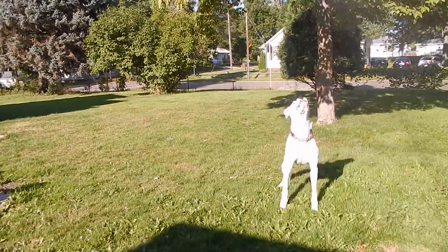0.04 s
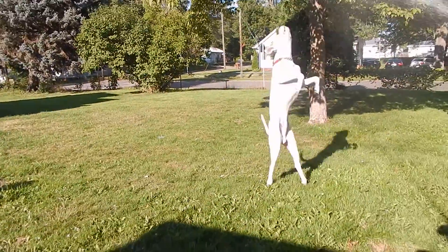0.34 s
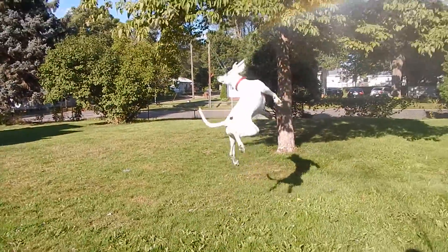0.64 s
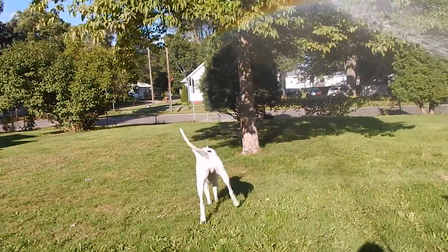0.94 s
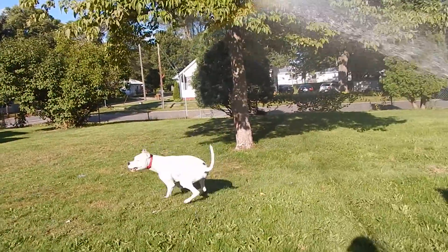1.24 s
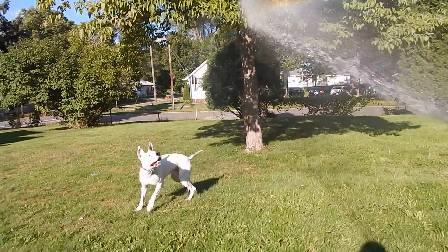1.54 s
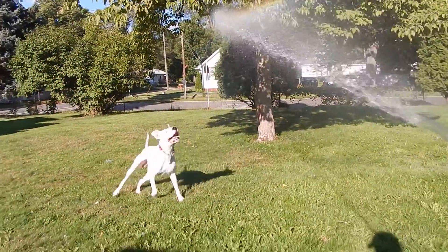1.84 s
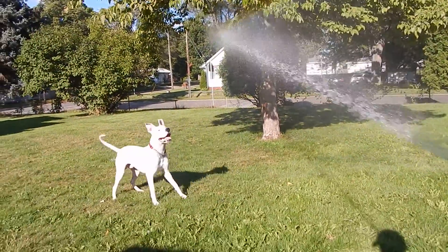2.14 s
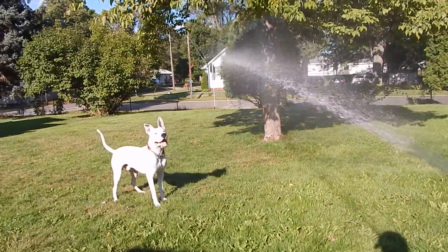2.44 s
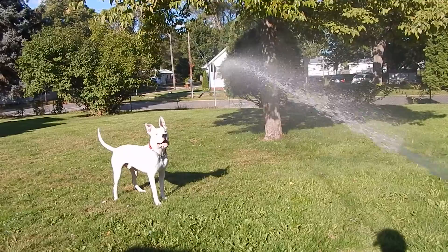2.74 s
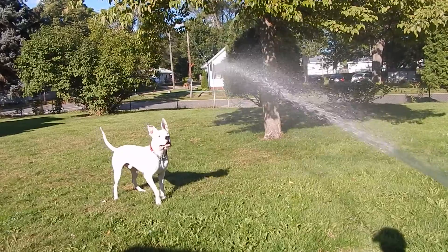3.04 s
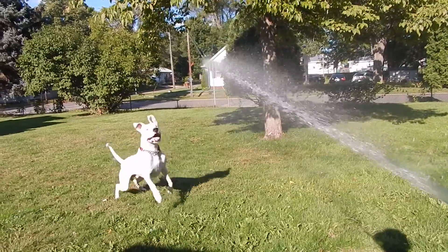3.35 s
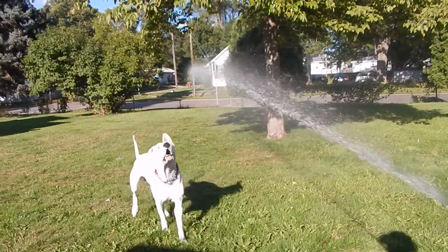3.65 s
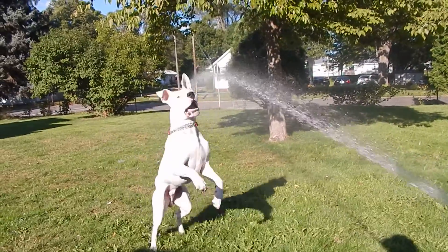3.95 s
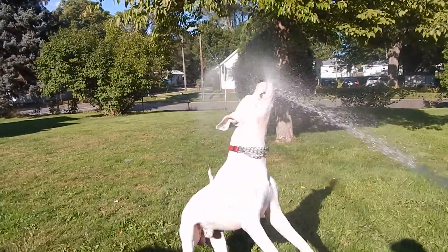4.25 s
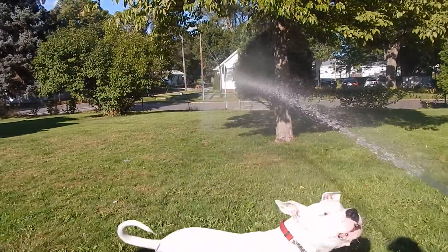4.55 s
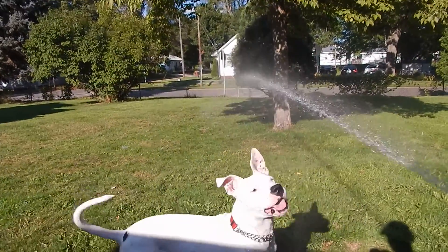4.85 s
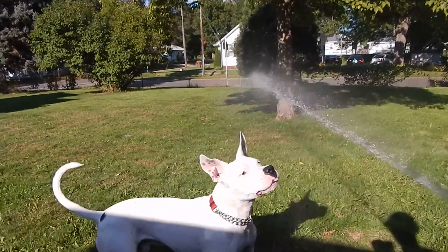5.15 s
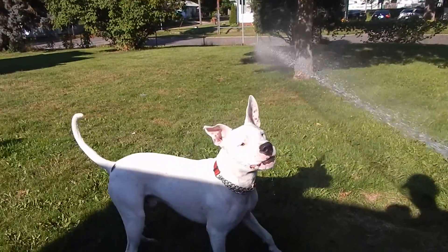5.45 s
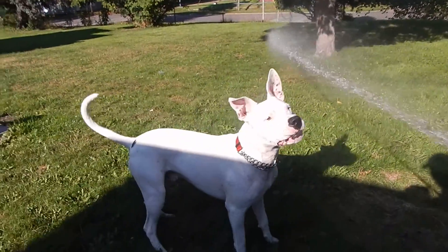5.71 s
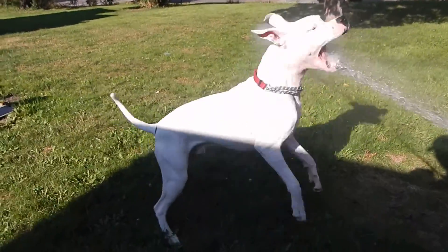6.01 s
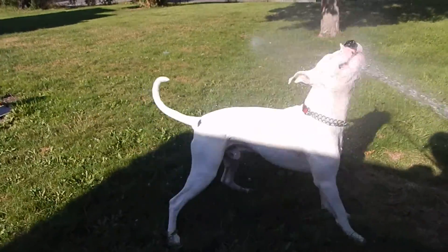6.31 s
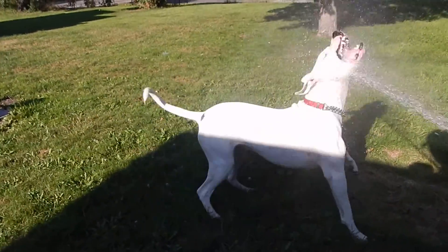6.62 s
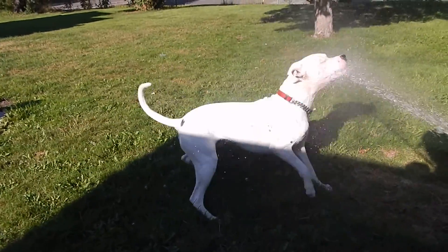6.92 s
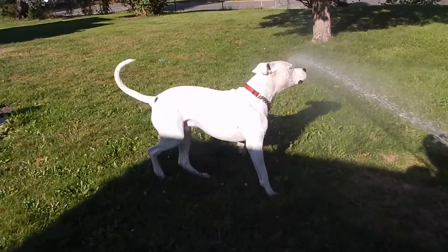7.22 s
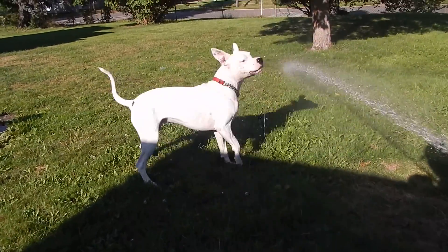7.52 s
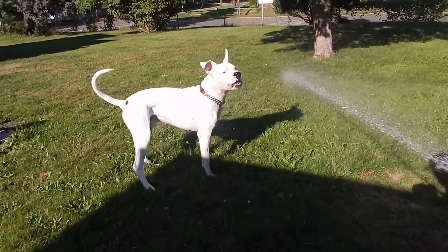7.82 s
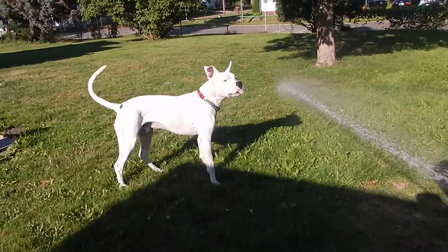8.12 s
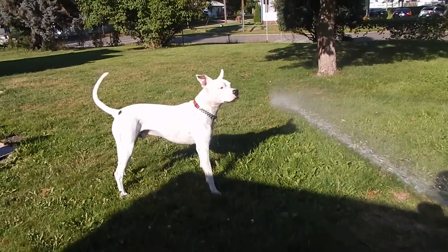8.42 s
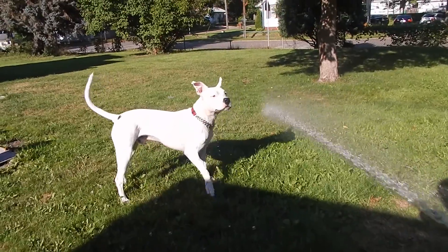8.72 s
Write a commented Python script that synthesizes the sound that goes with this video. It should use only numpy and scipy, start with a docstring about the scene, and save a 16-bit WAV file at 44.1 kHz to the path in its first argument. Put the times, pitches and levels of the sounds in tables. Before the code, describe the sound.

A garden hose hisses steadily close by, a little to the right, over a low rush. At first the spray patters through tree leaves. Later it splashes on a dog's muzzle, once briefly and then for longer, with gurgles and wet jaw smacks. Stray drops hit the microphone with sharp, loud clicks, and after the loudest the whole sound ducks and swells back. An engine drones faintly far off.

```python
"""A garden hose hisses close by while a dog jumps and bites at the jet of water.
The spray patters through leaves, drums on the dog's muzzle and sloshes in its mouth. An engine drones
far off. Stray drops hit the microphone's case with sharp clicks: the loud ones knock its automatic
volume control down, and the whole garden then swells back."""
import sys
import numpy as np
from scipy import signal
from scipy.fft import rfft, irfft, next_fast_len
from scipy.io import wavfile
from scipy.ndimage import uniform_filter1d, minimum_filter1d

SR = 44100
rng = np.random.default_rng(int(sys.argv[2]) if len(sys.argv) > 2 else 0)


def bounce(signal):
    """Save signal as a 16-bit WAV file at the path given by the first command-line argument."""
    frames = np.transpose(np.atleast_2d(signal))
    limited = np.clip(frames, -1, 1)
    pcm = np.round(limited * 32767).astype(np.int16)
    wavfile.write(sys.argv[1], SR, pcm)


N = 391166

# The jet's hiss as the nozzle is moved about: time_s, level_db
HISS_LEVELS = [(0, -36), (1.5, -34.5), (2.3, -40), (3.5, -41.5), (4.6, -42.5), (5.7, -39.5), (7.4, -43),
               (8.1, -42), (8.87, -38)]
# Tone of the bright hiss: frequency_hz, gain_db
HISS_TONE = [(400, -33), (800, -3), (1100, 1.5), (1450, -3.5), (2200, -3), (3200, -5), (4500, -7.5),
             (6500, -8.5), (8500, -9.5), (11000, -7.5), (13000, -14), (16000, -32)]
# Tone of the low rush under it: frequency_hz, gain_db
RUSH_TONE = [(20, -49), (45, -16), (80, -2), (130, -3.5), (200, 0), (340, -0.5), (480, -7), (800, -6),
             (1400, -19.5), (3000, -28.5)]

# One curve for each time the dog meets the jet: time_s, level_db, treble_lift_db
MUZZLE_HITS = [
    [(4.183, -28, 9), (4.212, -27, 9.5), (4.236, -18.5, 4), (4.28, -24, 5.5)],
    [(6.032, -26.5, 4.5), (6.08, -15, 1), (6.14, -19, 1.5), (6.19, -16.5, -5.5), (6.3, -26, 1.5),
     (6.43, -24, 3), (6.62, -16.5, -4), (6.73, -23.5, 3.5), (6.87, -28, -2), (7.0, -26.5, 0)],
]
# Tone of water hitting the dog: frequency_hz, gain_db
SPLASH_TONE = [(100, -18), (400, -13.5), (800, -9.5), (1200, -10), (2200, -3.5), (3500, -1), (5000, 0.5),
               (9000, 1), (11500, 0.5), (16000, -12)]
# The dog's mouth fills and its pitch sinks: start_s, length_s, first_hz, last_hz, level_db
MOUTH_FILLS = [(4.165, .11, 1037, 520, -32.5), (6.142, .24, 955, 620, -28)]
# Single smacks of the wet jaws: start_s, pitch_hz, level_db
JAW_SMACKS = [(6.837, 805, -32), (6.889, 790, -32), (7.102, 890, -38.5), (7.593, 1550, -31.5),
              (7.876, 2980, -39.5), (7.935, 930, -36.5)]

# Spray in the treetop until the jet is lowered: time_s, level_db
TREETOP_LEVELS = [(0, -36.5), (.4, -37), (.7, -35.5), (1.2, -31.5), (1.6, -38.5), (2.2, -48.5), (2.6, -83)]
# The jet brushes single branches: time_s, peak_db
BRANCH_HITS = [(.48, -30), (.57, -31), (.78, -27.5), (0.884, -30), (1.02, -29.5), (1.19, -33),
               (1.729, -32.5)]
# Tone of water hitting leaves: frequency_hz, gain_db
LEAF_TONE = [(200, -8.5), (600, -15), (1400, -6), (2800, 0), (4500, -3.5), (7500, -6.5), (11000, -6.5),
             (16000, -26)]

# Single drops on the case, from big knocks to faint ticks (splat and thud are relative to the tick): time_s,
# peak_db, splat_db, thud_db
SINGLE_DROPS = [(.0664, 14.5, -7, -24), (.0672, 17, -9, 3.5), (.1182, 8.5, -12, -24), (.294, 0.5, -24, -42),
                (1.252, 14.5, -1, -14), (2.2022, -4.5, -14, -31), (2.2608, -11, -10, -40),
                (2.5159, 12.5, -9, -25), (2.562, 9, -17, -37), (2.8398, 6.5, -15, -26),
                (2.9406, 9.5, -9.5, -35), (3.0814, 10, -9, -11), (3.477, -14, -14, -38),
                (4.329, 14, -9, -15.5), (4.3337, 9, -14, -4), (4.964, -7.5, -11, -18), (5.175, -14, -16, -40),
                (5.8219, -0.5, -13, -32), (5.9069, 10, -7.5, -24), (5.9447, -2.5, -18, -41),
                (6.283, 15, -7.5, -27), (6.2897, 9.5, -8.5, -20), (6.368, 3, -21, -37),
                (6.8074, 9, -10.5, -31), (7.219, 13.5, -11.5, -12)]
# Showers of fine drops drifting onto the case: start_s, length_s, peak_db
FINE_SHOWERS = [(0.169, .17, -14), (1.268, 0.086, -7), (3.11, .1, -15), (4.38, .17, -16), (4.97, .18, -15)]
# The case's high tick: pitch_hz, width_hz, gain_db
CASE_TICK = [(5570, 2100, -7), (7760, 2360, -3), (10560, 2040, -1)]
# Its midrange splat: pitch_hz, width_hz, gain_db
CASE_SPLAT = [(940, 950, -3), (2800, 1460, 1)]
# Its low thud: pitch_hz, width_hz, gain_db
CASE_THUD = [(45, 31, -10), (191, 110, 0.5), (486, 520, 0)]
# A click and its echoes from hand and body: delay_s, level_db, decay_s
CLICK_ECHOES = [(0, 1, 0.00025), (.0011, -14, 0.00056), (.0056, -23.5, .0007), (.0075, -24, 0.00056)]

# The far engine's tones: multiple_of_firing_rate, level_db
ENGINE_TONES = [(1, -59), (2, -57.5), (3, -63), (4, -65)]

# The microphone hears through two openings, its ports. The hose is on the right,
# so the case shades the left port: frequency_hz, left_minus_right_db
PORT_SHADE = [(100, 0), (700, 0), (1300, -1.5), (2400, -6), (4400, -6.5), (8000, -8.5), (15000, -9)]
# How alike the two ports sound: frequency_hz, likeness_0_to_1
PORT_LIKENESS = [(100, .98), (600, 1), (1500, .75), (4000, 0.63), (9000, 0.66), (15000, 0.61)]
# Narrow dips in the microphone's tone: frequency_hz
MIC_NOTCHES = [2514, 3980, 5006, 7460, 9930]


def hose(flight_s=.19, lag_s=0.00011):
    """The jet tears into fine drops, making a bright hiss over a low, churning rush."""
    jet_db, = in_time(HISS_LEVELS)
    # the dog stops the jet short, so one flight time later less water is in the air
    t = np.arange(N) / SR - flight_s
    blocked = sum((t > curve[0][0]) * (t < curve[-1][0]) * 1.0 for curve in MUZZLE_HITS)
    blocked = uniform_filter1d(blocked, size=SR // 10)
    hiss_db = jet_db - 4 * blocked
    rush_db = -43.5 + 0.6 * (jet_db - jet_db.mean()) - 3 * blocked   # partly follows the hiss
    hiss = at_ports(droplets(per_s=14000, spread_db=3.0, mist=1.22), HISS_TONE, shade=1.08, lag_s=lag_s)
    rush = at_ports(rng.standard_normal((3, N)), RUSH_TONE, shade=0.52, lag_s=lag_s)
    hiss = hiss * from_db(hiss_db + .5 * drift(per_s=35))
    rush = rush * from_db(rush_db + 0.84 * drift(per_s=22))
    return hiss + rush


def droplets(per_s, spread_db, mist):
    """Three separate streams of tiny impacts, uneven in size, over a smooth mist of noise."""
    sizes = from_db(spread_db * np.minimum(rng.exponential(1, (3, N)), 3))
    signs = rng.choice([-1, 1], (3, N))
    lands = rng.random((3, N)) < per_s / SR
    return rms_one(sizes * signs * lands) + mist * rng.standard_normal((3, N))


def muzzle_splash():
    """The jet bursts on the dog in clumps of hard drops, brighter when it hits squarely."""
    impacts = droplets(per_s=2200, spread_db=4.0, mist=0.68)
    splash = at_ports(impacts, SPLASH_TONE, shade=0.54, lag_s=.00003)
    # a close echo makes the splash sound hollow
    splash = rms_one(splash + from_db(-13.0) * np.roll(splash, round(.00135 * SR), axis=1))
    body = signal.sosfilt(signal.butter(1, 4500, fs=SR, output="sos"), splash)
    treble = splash - body
    clumps_db = 1.3 * drift(per_s=260)
    out = 0
    for curve in MUZZLE_HITS:
        level_db, lift_db = in_time(curve)
        gain = from_db(level_db + contact_db(curve) + clumps_db)
        out = out + (body + treble * from_db(lift_db)) * gain
    return out


def contact_db(curve, rise_db_per_s=900, fall_db_per_s=580):
    """0 dB while the jet is on the dog, with a quick fade in before and a fade out after."""
    t = np.arange(N) / SR
    before_s, after_s = np.maximum(curve[0][0] - t, 0), np.maximum(t - curve[-1][0], 0)
    return -rise_db_per_s * before_s - fall_db_per_s * after_s


def mouth_sloshes(fade_cycles=17.4):
    """Water rings briefly in the hollow of the dog's mouth; a smaller hollow dies away sooner."""
    out, t = np.zeros(N), np.arange(SR // 4) / SR
    for start_s, hz, db in JAW_SMACKS + gurgles():
        slosh = rng.standard_normal(len(t)) * t * np.exp(-(t * hz / fade_cycles) ** 2)   # swells, dies
        ring = peak_one(resonate(slosh, [(hz, 0.1 * hz, 0)]))
        add(out, from_db(db) * 1.85 * ring, start_s)
    return out


def gurgles(gap_s=.036, fade_db=6, wander_octaves=.13, spread_db=2.5):
    """A filling mouth sloshes lower and softer, no two alike. Gives rows: start_s, pitch_hz, level_db."""
    rows = []
    for start_s, length_s, first_hz, last_hz, db in MOUTH_FILLS:
        for filled in np.linspace(0, 1, round(length_s / gap_s) + 1):
            pitch, strength = rng.uniform(-1, 1, 2)
            hz = first_hz * (last_hz / first_hz) ** filled * 2 ** (wander_octaves * pitch)
            rows.append((start_s + length_s * filled, hz, db - fade_db * filled + spread_db * strength))
    return rows


def leaf_patter(branch_s=0.035):
    """Spray patters evenly on leaves across the lawn and swells on each branch."""
    t = np.arange(N) / SR
    treetop_db, = in_time(TREETOP_LEVELS)
    branch_power = sum(from_db(db) ** 2 * np.exp(-((t - s) / branch_s) ** 2) for s, db in BRANCH_HITS)
    gain = np.sqrt(from_db(treetop_db) ** 2 + branch_power)
    impacts = droplets(per_s=4000, spread_db=4.5, mist=0.46)
    return gain * at_ports(impacts, LEAF_TONE, shade=0.36, lag_s=.00002)


def drops_on_case(lead_s=0.02):
    """Each drop bursts on the case in under a millisecond; one that lands on the right port also thuds."""
    out, t = np.zeros((2, N)), np.arange(SR // 4) / SR - lead_s
    # after the close echoes, sound scatters off the ground, then faintly off house and trees
    echoes = CLICK_ECHOES + [(0, -26.5, 0.0079), (0, -39, 0.047)]
    burst = sum(from_db(db) * (t >= delay_s) * np.exp(-np.abs(t - delay_s) / decay_s)
                for delay_s, db, decay_s in echoes)
    # a low thud swells briefly just before the click, then cuts off
    swell = np.exp(-np.abs(t) / np.where(t < 0, .0015, .0002))
    thud = peak_one(resonate(swell, CASE_THUD))
    lone_drops = fine_drops(0, N / SR, peak_db=-20, per_s=.8)
    showers = [drop for shower in FINE_SHOWERS for drop in fine_drops(*shower, per_s=26)]
    click_sides, thud_sides = from_db([[-5.5], [0]]), from_db([[-19], [0]])   # left, right
    for time_s, peak_db, splat_db, thud_db in SINGLE_DROPS + lone_drops + showers:
        forces = rng.standard_normal((2, len(t))) * burst
        tick = np.array([peak_one(resonate(force, CASE_TICK)) for force in forces])
        splat = np.array([peak_one(resonate(force, CASE_SPLAT)) for force in forces])
        hit = (tick + from_db(splat_db) * splat) * click_sides + from_db(thud_db) * thud * thud_sides
        add(out, from_db(peak_db) * peak_one(hit), time_s - lead_s)
    return out


def fine_drops(start_s, length_s, peak_db, per_s, spread_db=1.5, splat_db=-20, thud_db=-40):
    """Fine drops land unevenly and tick, with little splat or thud. Gives rows like SINGLE_DROPS."""
    count = max(round(length_s * per_s), 1)
    return [(start_s + length_s * (k + when) / count, peak_db + spread_db * (2 * size - 1),
             splat_db, thud_db) for k, (when, size) in enumerate(rng.random((count, 2)))]


def far_engine(firing_hz=94.2):
    """An engine's steady firing makes low tones that waver over the distance."""
    phase = 2 * np.pi * np.cumsum(firing_hz * (1 + 0.0064 * drift(per_s=4))) / SR
    return sum(np.sqrt(2) * from_db(db + 2.0 * drift(per_s=9)) * np.sin(multiple * phase)
               for multiple, db in ENGINE_TONES)


def at_ports(streams, tone, shade, lag_s):
    """Turn three noise streams into stereo with a given tone; the left port hears it later and duller."""
    size = next_fast_len(N, real=True)
    hz = np.arange(size // 2 + 1) * SR / size
    shared, *separate = rfft(streams, size)
    alike = np.clip(at_hz(PORT_LIKENESS, hz), 0, 1)
    left, right = np.sqrt(alike) * shared + np.sqrt(1 - alike) * np.array(separate)
    delay = np.exp(-2j * np.pi * hz * lag_s)
    tilt = from_db(shade * at_hz(PORT_SHADE, hz) / 2)
    spectrum = np.array([left * delay * tilt, right / tilt]) * from_db(at_hz(tone, hz))
    return rms_one(irfft(spectrum, size)[:, :N])


def auto_volume(x, ceiling_db=-8.5, hold_s=0.13, recovery_db_per_s=15.5):
    """The volume ducks at once under any peak above the ceiling, holds, then creeps back up."""
    over_db = np.maximum(20 * np.log10(np.abs(x).max(axis=0) + 1e-9) - ceiling_db, 0)
    over_db[0] = 15   # the volume starts out ducked
    half_hold = int(hold_s * SR / 2)
    held_db = -minimum_filter1d(-over_db, 2 * half_hold + 1, origin=half_hold, mode="nearest")
    recovery_db = recovery_db_per_s * np.arange(N) / SR
    duck_db = np.maximum.accumulate(held_db + recovery_db) - recovery_db
    # a short look ahead lets the volume dive just before the peak
    return x * from_db(uniform_filter1d(minimum_filter1d(-duck_db, size=111), size=111))


def resonate(x, rings):
    """Make x ring at several pitches, added with alternating signs. Rows: pitch_hz, width_hz, gain_db."""
    out = 0
    for k, (hz, width_hz, db) in enumerate(rings):
        radius = np.exp(-np.pi * width_hz / SR)
        poles = [1, -2 * radius * np.cos(2 * np.pi * hz / SR), radius ** 2]
        ring = (1 - radius ** 2) / 2 * signal.lfilter([1, 0, -1], poles, x)
        out = out + (-1) ** k * from_db(db) * ring
    return out


def drift(per_s):
    """A random wander of typical size 1 that turns per_s times a second."""
    points = rng.standard_normal(int(N / SR * per_s) + 2)
    return rms_one(np.interp(np.arange(N) / SR * per_s, np.arange(len(points)), points))


def in_time(rows):
    """Read each column of a time table at every sample."""
    time_s, *columns = np.transpose(rows)
    return [np.interp(np.arange(N) / SR, time_s, column) for column in columns]


def at_hz(rows, hz):
    """Read a frequency table at the given frequencies."""
    known_hz, values = np.transpose(rows)
    return np.interp(np.log(hz + 1), np.log(known_hz), values)


def add(out, sound, start_s):
    """Mix a short sound in at its start time."""
    at = max(round(start_s * SR), 0)
    out[..., at:at + sound.shape[-1]] += sound[..., :N - at]


def from_db(db):
    """Turn decibels into a number to multiply by."""
    return np.exp(np.asarray(db) * (np.log(10) / 20))


def rms_one(x):
    """Scale so the average level (root mean square) is 1."""
    return x / np.sqrt(np.mean(x ** 2) + 1e-20)


def peak_one(x):
    """Scale so the highest peak is 1."""
    return x / np.abs(x).max()


def scene():
    """The whole garden as it reaches the two ports."""
    return hose() + leaf_patter() + muzzle_splash() + mouth_sloshes() + far_engine() + drops_on_case()


def record(dry, cutoff_hz=16900):
    """The microphone rides the volume, cuts a few narrow notches and loses the highest treble."""
    out = auto_volume(dry)
    for hz in MIC_NOTCHES:
        out = signal.lfilter(*signal.iirnotch(hz, hz / 110, fs=SR), out)
    return signal.sosfilt(signal.cheby2(16, 60, cutoff_hz, fs=SR, output="sos"), out)


dry = scene()
out = record(dry)
bounce(out)
```